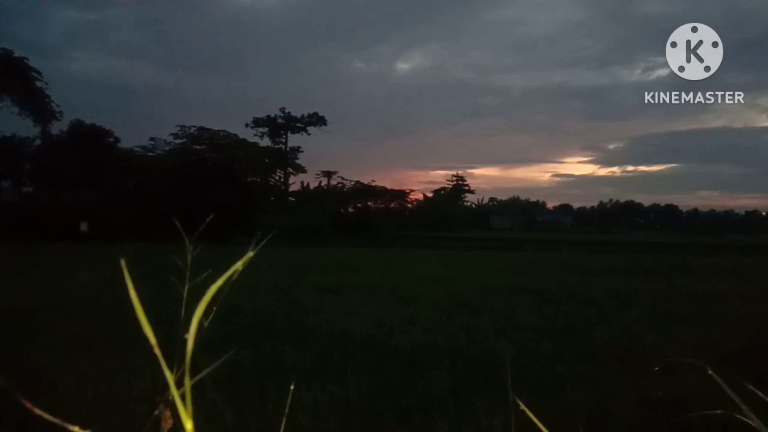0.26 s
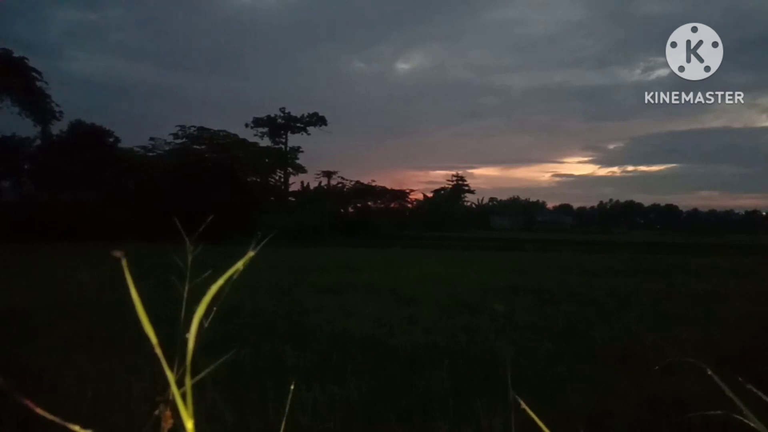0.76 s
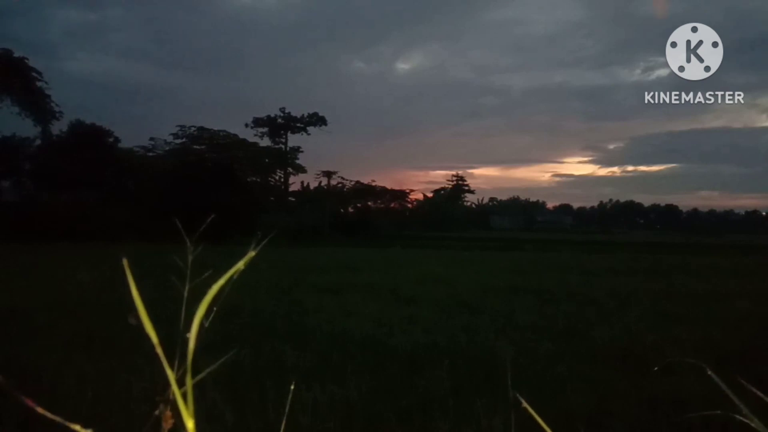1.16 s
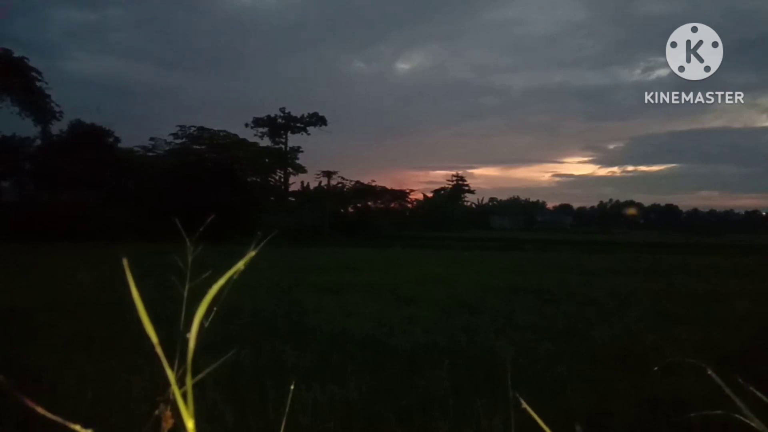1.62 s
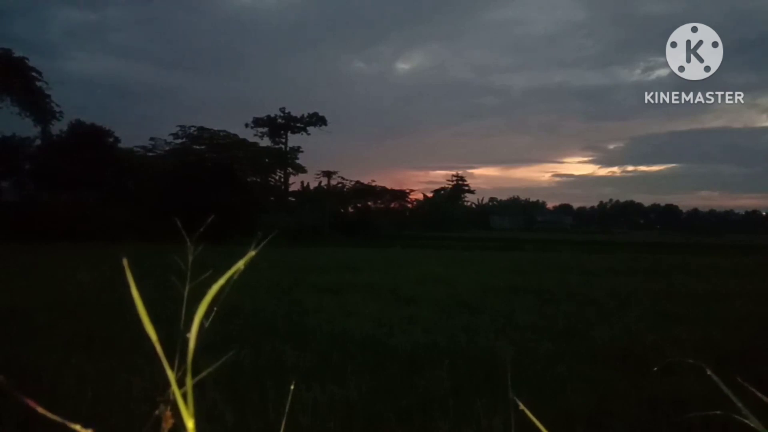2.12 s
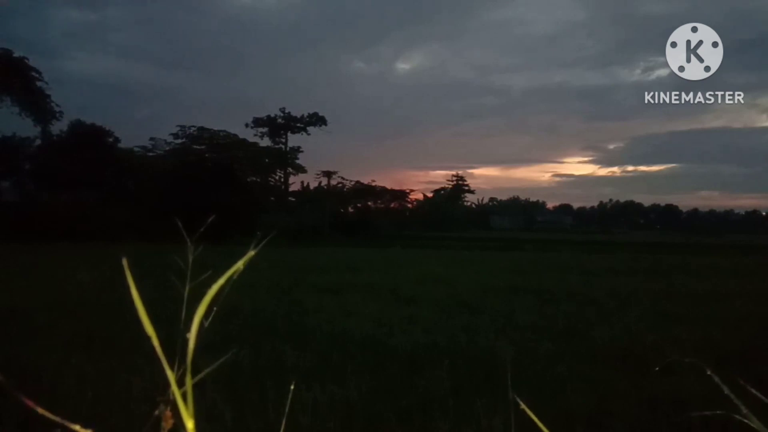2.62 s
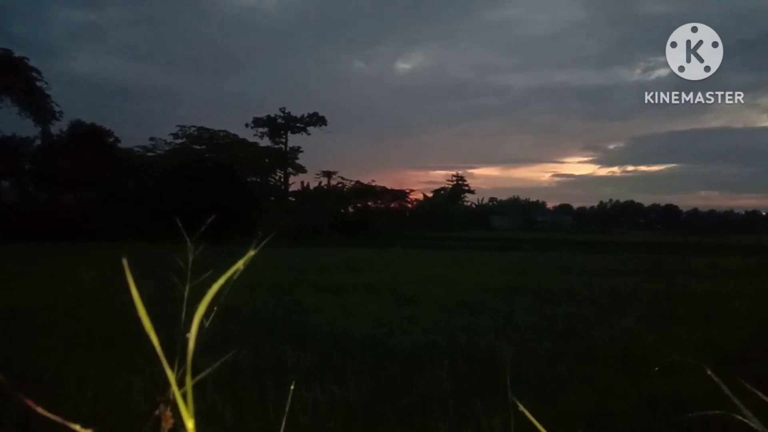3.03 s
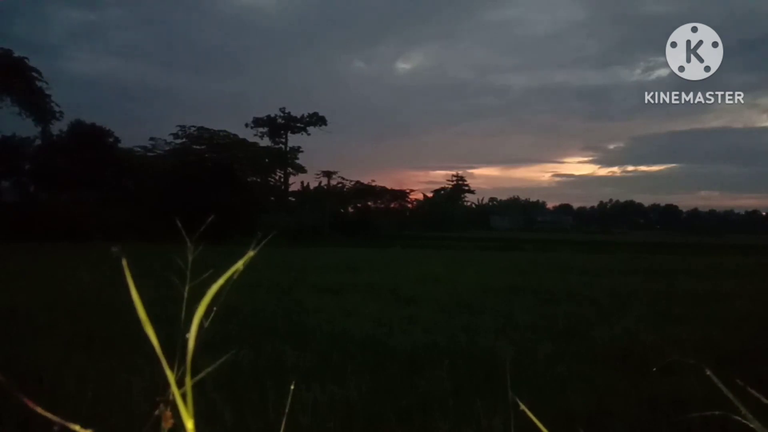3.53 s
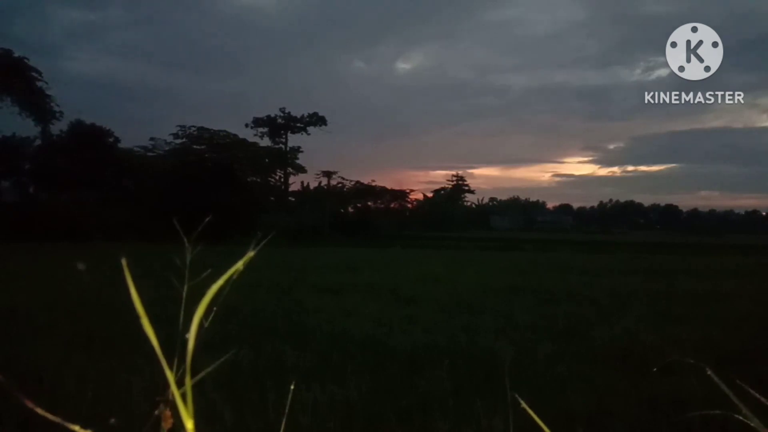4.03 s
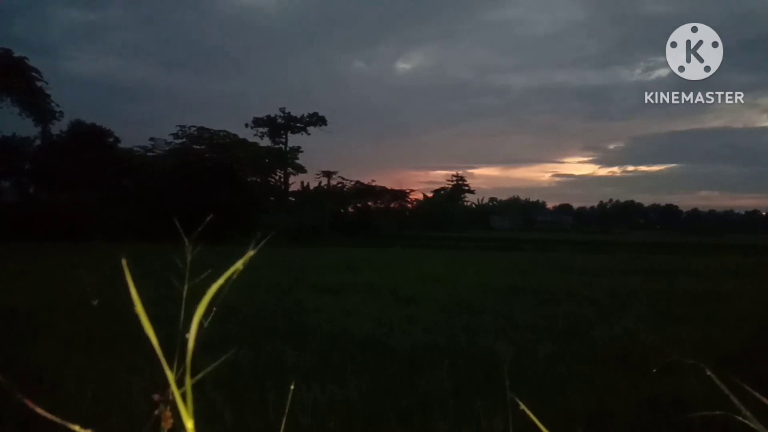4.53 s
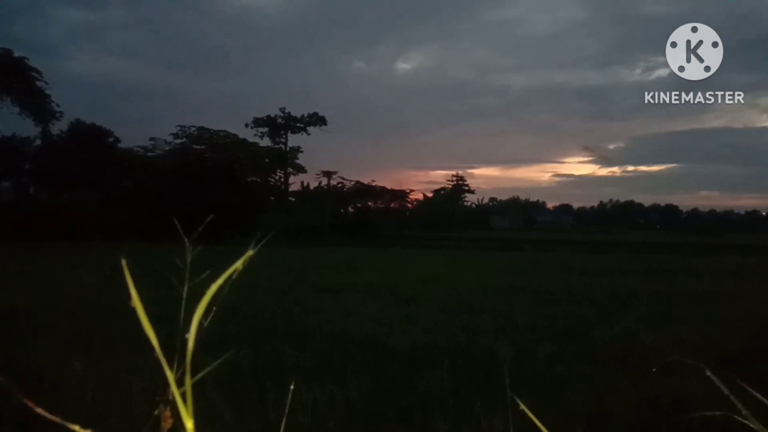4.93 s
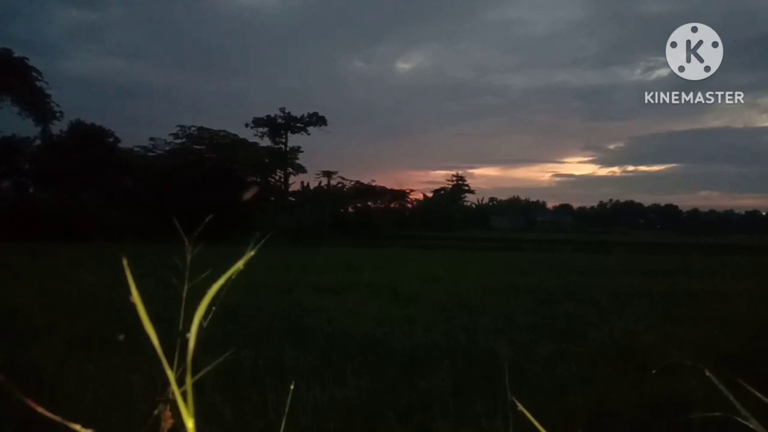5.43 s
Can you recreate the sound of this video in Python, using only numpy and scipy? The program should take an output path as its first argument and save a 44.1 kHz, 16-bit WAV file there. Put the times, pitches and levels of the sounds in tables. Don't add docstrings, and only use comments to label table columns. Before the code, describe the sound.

Dusk over open fields, with constant soft air hiss, faint low rumble and a high shimmering insect chorus that briefly hushes near 3.8 and 4.8 s. From 0 to 2.5 s an owl gives a low, rapid trill, about twelve soft sinking notes a second, with hoarse breath ending by 2.8. A near cricket chirps in four bright bursts from 0.3 to 1.1. From 1.7 to 2.7 a second, higher owl adds eight short arched hoots, growing from faint to strong. At 3.3 it gives a long hoot, rising quickly then falling until 4.1, echoing from trees; a sharp dry crack snaps at its start. Small frogs peep roughly every second, fainter ones between, over soft pulsed frog trills. Thin cricket buzzes pepper 3.6 to 5.1, with a faint grass brush at 4. Tiny ticks come at 5.3, then thin, wavering far owl whistles to 5.7.

```python
import sys
import numpy as np
from scipy import signal
from scipy.fft import rfft, irfft, next_fast_len
from scipy.io import wavfile
from scipy.ndimage import uniform_filter1d

SR = 44100
rng = np.random.default_rng(int(sys.argv[2]) if len(sys.argv) > 2 else 0)


def ratio(d):
    e = np.asarray(d, float) / 20
    return 10 ** e


def unload_wav(signal):
    wavfile.write(
        sys.argv[1],
        SR,
        np.round(np.clip(np.atleast_2d(signal).T, -1, 1) * 32767).astype(np.int16),
    )


N = 249606


def evened(x):
    return x / np.sqrt(np.mean(x ** 2) + 1e-20)


def add(mix, s, sound):
    part = mix[max(round(s * SR), 0):][:len(sound)]
    part += sound[:len(part)]


def resonate(x, hz, width_hz):
    turn = np.exp(2j * np.pi * np.cumsum(hz * np.ones(len(x))) / SR)
    r = np.exp(-np.pi * width_hz / SR)
    smoothed = signal.lfilter([(1 - r) ** 2], np.convolve([1, -r], [1, -r]), x / turn)
    return 2 * (turn * smoothed).real


def tone(hz, second_db=-60):
    turn = 2 * np.pi * (np.cumsum(hz) / SR + rng.random())
    return np.sin(turn) + ratio(second_db) * np.sin(2 * turn)


def note(length_s, shape):
    u = np.arange(round(length_s * SR)) / (length_s * SR)
    return u, uniform_filter1d(np.interp(u, *np.transpose(shape)), size=150, mode="constant")


def along(rows):
    s, *columns = np.transpose(rows)
    t = np.arange(s[0], s[-1], 1 / SR)
    return [np.interp(t, s, c) for c in columns]


def flutter(per_s):
    t = np.arange(0, N + 64, 64)
    rates = per_s * np.geomspace(.2, 1, 12)
    slow = sum(np.sin(2 * np.pi * (f * t / SR + rng.random())) for f in rates)
    return np.interp(np.arange(N), t, evened(slow))


def tail(x, t60, start_s):
    t = np.arange(2 * SR) / SR
    signs = np.sign(rng.standard_normal(len(t)))
    sparse = rng.random(len(t)) < .045
    taps = signs * sparse * ratio(-60 * t / t60) * (t > start_s)
    size = next_fast_len(N + len(t))
    return irfft(rfft(x, size) * rfft(taps / np.linalg.norm(taps), size), size)[:N]


def hiss(points, patchy_db):
    frames, hz = N // 256 + 5, np.fft.rfftfreq(1024, 1 / SR)
    a, b, patches = rng.standard_normal((frames, 513, 3)).T
    patches = uniform_filter1d(uniform_filter1d(patches, size=5, axis=0), size=8, axis=1)
    f, db = np.transpose(points)
    colour_db = np.interp(np.log(hz + 1), np.log(f + 1), db)[:, None]
    spectra = (a + 1j * b) * ratio(colour_db + patchy_db * evened(patches))
    return evened(signal.istft(spectra, nperseg=1024, noverlap=768)[1][:N])


def breath():
    end_s, fade_s = 2.72, 0.047
    over = np.maximum(np.arange(N) / SR - end_s, 0) / fade_s
    air = evened(resonate(rng.standard_normal(N), 694, width_hz=240))
    return ratio(-44 - 20 * over + 1.9 * flutter(21)) * air


# start in seconds, length in seconds, peak in dB.
TRILL = [(0.0, 0.03, -14.5), (0.073, 0.047, -15.5), (0.152, 0.046, -15.5), (0.231, 0.043, -14.5),
         (0.311, 0.04, -14.5), (0.384, 0.04, -15), (.461, .039, -13.5), (0.537, 0.039, -13.5),
         (0.611, 0.041, -15.5), (0.684, 0.038, -14.5), (0.759, 0.035, -13.5), (0.828, .042, -15),
         (.902, 0.044, -15), (.99, 0.042, -14), (1.082, 0.045, -13.5), (1.179, 0.049, -12.5),
         (1.279, 0.051, -13), (1.382, 0.048, -13), (1.48, 0.055, -12.5), (1.578, 0.062, -13.5),
         (1.684, 0.052, -14), (1.783, 0.045, -13), (1.879, 0.043, -13), (1.971, 0.047, -13.1),
         (2.061, 0.038, -13.5), (2.136, 0.044, -13), (2.209, 0.037, -14), (2.274, 0.044, -14),
         (2.351, 0.033, -13.5), (2.421, 0.035, -14.5)]


def trilling_owl():
    out, sounding = np.zeros(N), np.zeros(N)
    end_hz = 497
    for s, length, db in TRILL:
        u, shape = note(length + 0.011, [(0, 0.096), (.2, 0.76), (.42, 0.98), (.58, 0.91), (.85, 0.25), (1, 0)])
        start_hz = 547.3 + 4.8 * s
        hz = start_hz + (end_hz - start_hz) * u ** 2.03
        add(out, s - .004, ratio(db) * shape * tone(hz, second_db=-33))
        add(sounding, s - .004, shape)
    returns = ratio(-18) * tail(out, t60=0.26, start_s=0.0088)
    return out + returns + ratio(-4.1 * sounding) * breath()


# start in seconds, peak in dB rms.
ROUNDS = [
    (-.5, -40),
    (.55, -40.5),
    (1.58, -40.5),
    (2.64, -41),
    (3.73, -41.5),
    (4.72, -41),
    (5.75, -43),
]
# fraction gone by, upper throat pitch in Hz, level in dB.
ROUND = [(0, 3040, -11), (.3, 3050, -3), (.6, 3302, -2.5), (.93, 3310, -6), (1, 3370, -12)]


def trilling_frogs():
    start, peak_db = np.transpose(ROUNDS)
    fraction, throat_hz, swell_db = np.transpose(ROUND)
    t = np.arange(N) / SR
    rounds = np.interp(t, start, np.arange(len(start)))
    hz = np.interp(rounds % 1, fraction, throat_hz)
    db = peak_db[rounds.astype(int)] + np.interp(rounds % 1, fraction, swell_db)
    gate = 0.81 + np.exp(-(t * 128.5 % 1) / 0.27)
    upper = evened(resonate(gate * rng.standard_normal(N), hz, width_hz=335))
    lower_hz = 1590 + 0.27 * (hz - 3200)
    lower = evened(resonate(gate * rng.standard_normal(N), lower_hz, width_hz=225))
    return ratio(db) * upper + ratio(0.53 * (db + 48.0) - 49.5) * lower


# centre in Hz, width in Hz, level in dB rms, strokes per second, throb in dB.
CHORUS = [
    (4714, 700, -43.5, 1100, 0),
    (5814, 200, -43, 910, 0),
    (6180, 150, -48.5, 430, 4),
    (8110, 980, -47, 2500, 2),
]
# centre in seconds, half length in seconds, depth in dB.
LULLS = [
    (1.595, .06, -1.5),
    (3.78, 0.027, -10),
    (4.756, 0.059, -10),
]


def chorus():
    t = np.arange(N) / SR
    db = sum(depth_db * np.maximum(1 - abs(t - s) / half, 0) for s, half, depth_db in LULLS)
    throb = np.sin(2 * np.pi * 4.4 * t + 1.1 + 0.8 * flutter(0.51))
    out = np.zeros(N)
    for hz, width, band_db, per_s, throb_db in CHORUS:
        strokes = rng.standard_normal(N) * (rng.random(N) < per_s / SR)
        strokes *= ratio(0.43 * np.minimum(rng.exponential(1, N), 4))
        level_db = band_db + throb_db * throb + 1.57 * flutter(12)
        out += ratio(level_db) * evened(resonate(strokes, hz, width))
    return out * ratio(db - db.mean())


# pitch in Hz, level in dB per Hz.
AIR = [(1000, -28), (1300, -12.5), (1600, -14), (2050, -10.5), (2600, -6), (3000, -3), (3900, -5),
       (4900, -2), (5900, 0), (6900, -8.5), (9200, -10), (9700, -15.5), (11000, -19.5), (15500, -19)]
# pitch in Hz, level in dB per Hz.
RUMBLE = [(15, -32), (30, -23), (55, -17.5), (82, 0), (110, -7), (160, -4), (300, -8.5), (600, -8.5),
          (900, -9.5), (1200, -11.5), (1500, -41.5)]


def open_air():
    return ratio(-36) * hiss(AIR, patchy_db=2.0) + ratio(-50) * hiss(RUMBLE, patchy_db=-1.5)


# pitch in Hz, level in dB per Hz.
APART = [(20, -33), (60, -13), (200, -6.5), (500, -14.5), (1100, -21), (1600, -32.5), (4100, -15.5),
         (4700, 6.5), (5200, -19), (6200, -23), (6600, 6.5), (7000, -23.5), (12000, -16), (15500, -20)]


def air_apart():
    return ratio(-50) * hiss(APART, patchy_db=2.0)


# time of full voice in seconds, level in dB rms.
PEEPS = [
    (0.659, -35.5),
    (1.724, -34.5),
    (2.767, -34.5),
    (3.82, -34.5),
    (4.836, -34.5),
]
# start in seconds, peak in dB.
FAINT_PEEPS = [
    (.02, -38),
    (1.09, -40),
    (2.141, -39),
    (3.2, -40),
    (4.24, -36),
    (5.28, -39),
]


def peeping_frogs():
    loud, out = np.zeros(N), np.zeros(N)
    rise_s, hold_s, fall_s, soft_db = .1, 0.064, 0.07, -13.5
    corners = np.cumsum([0, rise_s, hold_s, fall_s])
    t = np.arange(0, corners[-1], 1 / SR)
    hz = 1459 + 40 * np.exp(-t / 0.124)
    for s, level_db in PEEPS:
        swell_db = np.interp(t, corners, [soft_db, 0, -.7, soft_db]) + 0.39 * flutter(35.4)[:len(t)]
        voice = tone(hz, second_db=14 + 1.1 * swell_db) * signal.windows.tukey(len(t), .1)
        add(loud, s - rise_s, ratio(level_db - 9.0 + 0.33 * swell_db) * voice)
        u, shape = note(0.22, [(0, 0), (.4, 0.3), (1, 0.1)])
        add(out, s, ratio(level_db - 6.5) * shape * tone(3222 + 12 * (.5 - u)))
    add(out, .09, ratio(-16) * loud)
    for s, db in FAINT_PEEPS:
        u, shape = note(0.077, [(0, 0.81), (.4, 0.7), (1, 0.2)])
        add(out, s, ratio(db - 14) * shape * tone(1472 - 6 * u, second_db=10.5))
    out += loud
    return out + ratio(-4.5) * tail(out, t60=0.46, start_s=0.015)


def stroke(length_s, start_hz, end_hz):
    u, shape = note(length_s, [(0, 0.39), (.12, 0.3), (.28, 0.58), (.43, 0.41), (.58, 0.71), (.75, 0.19),
                               (1, 0.045)])
    lift = 1 + 0.005 * rng.standard_normal()
    return shape * tone(lift * (start_hz + (end_hz - start_hz) * u ** 1.32))


# start in seconds, peak in dB.
CHIRPS = [(0.342, -19), (.375, -18), (.409, -16), (.444, -18), (.594, -20), (0.628, -16.5), (.659, -16),
          (0.807, -18.5), (.84, -16), (0.875, -17), (1.021, -18), (1.054, -16.5), (1.088, -16.5)]
# start in seconds, length in seconds, peak in dB.
BUZZES = [
    (1.224, .09, -33),
    (3.577, 0.046, -27),
    (3.797, 0.076, -26),
    (4.049, 0.094, -28.5),
    (4.312, 0.083, -27),
    (4.6, .062, -25.5),
    (4.908, 0.043, -25),
    (5.042, 0.044, -34),
]
# time in seconds, pitch in Hz, level in dB rms.
WHISTLE = [(3.791, 5540, -43), (3.81, 5450, -42), (3.94, 5510, -37), (3.969, 5550, -40)]


def crickets():
    near, out = np.zeros(N), np.zeros(N)
    for s, db in CHIRPS:
        add(near, s - .002, ratio(db) * stroke(0.0235, start_hz=5140, end_hz=4200))
    add(out, .018, ratio(-16) * near)
    out += ratio(-4.5) * tail(near, t60=0.16, start_s=0.0044)
    u = np.linspace(0, 1, 230)
    for s, length, db in BUZZES:
        for at in np.arange(0, length, 1 / 113):
            late_s = 0.00092 * rng.standard_normal()
            level = ratio(db - 1.7 * rng.random())
            add(out, s + at + late_s, level * np.sin(np.pi * u) ** 0.71 * tone(5450 - 1150 * u ** 0.95))
    hz, db = along(WHISTLE)
    level = np.sqrt(2) * ratio(db + 2.4 * flutter(79)[:len(db)])
    add(out, WHISTLE[0][0], level * tone(uniform_filter1d(hz, size=1500)))
    return near + out


# start in seconds, length in seconds, centre in Hz,
# level in dB rms.
RUSTLES = [
    (0.748, .05, 600, -53),
    (3.998, 0.13, 1920, -47),
    (4.642, 0.2, 1513, -52),
]


def rustles():
    out = np.zeros(N)
    for s, length, hz, db in RUSTLES:
        u, shape = note(length, [(0, 0), (.15, 1), (1, 0)])
        add(out, s, ratio(db) * shape * evened(resonate(rng.standard_normal(len(u)), hz, width_hz=hz)))
    return out


# start in seconds, length in seconds, peak in dB, top in Hz, arch depth in Hz.
NOTES = [
    (1.71, 0.038, -31.5, 756, 39),
    (1.848, 0.053, -20, 794, 16),
    (1.982, 0.056, -12, 819.5, 23.4),
    (2.109, 0.061, -11, 837, 29.6),
    (2.245, 0.054, -12, 851, 41),
    (2.377, 0.064, -12, 846.7, 46),
    (2.511, 0.059, -10.5, 840, 27),
    (2.658, 0.047, -9.5, 848, 32.4),
]
ARCH = [(0, -1.88), (.2, -.85), (.62, 0.54), (.86, -.75), (1, -2)]
# time in seconds, pitch in Hz, level in dB rms.
HOOT = [(3.275, 615, -53.5), (3.332, 738, -19.5), (3.359, 806, -13.5), (3.42, 829, -9.5), (3.57, 818, -10),
        (3.72, 804, -13.5), (3.882, 774.6, -13.5), (4.002, 688, -28.5), (4.1, 572, -46.5)]
# delay in seconds, level in dB.
ECHOES = [
    (.03, -25.5),
    (.082, -13.5),
    (.097, -38),
    (.125, -22.5),
]


def hooting_owl():
    notes, hoot, thrown = np.zeros(N), np.zeros(N), np.zeros(N)
    for s, length, db, top_hz, depth_hz in NOTES:
        u, shape = note(length + 0.024, [(0, 0), (.11, 0.51), (.36, 0.97), (.62, 0.62), (.84, 0.62), (1, 0)])
        hz = top_hz + depth_hz * np.interp(u, *np.transpose(ARCH))
        add(notes, s - .008, ratio(db) * shape * tone(uniform_filter1d(hz, size=300), second_db=-45.5))
    hz, db = along(HOOT)
    level = np.sqrt(2) * ratio(uniform_filter1d(db, size=400))
    add(hoot, HOOT[0][0], level * tone(uniform_filter1d(hz, size=800)))
    away = notes + ratio(-5.5) * hoot
    for delay, db in ECHOES:
        add(thrown, delay, ratio(db) * away)
    thrown = resonate(thrown, 716, width_hz=530)
    add(thrown, .11, ratio(-8) * resonate(hoot, 792.7, width_hz=26))
    near = ratio(-20 + .8 * flutter(18)) * tail(away, t60=.5, start_s=.05)
    far = ratio(-17.0 + 2.1 * flutter(40)) * tail(away, t60=2.0, start_s=0.17)
    return notes + hoot + thrown + near + far


# start in seconds, peak in dB, centre in Hz, width in Hz, decay in seconds.
SNAPS = [
    (3.3296, -9, 5800, 6500, .0018),
    (5.2778, -21, 13500, 6000, .0004),
    (5.3084, -25, 13000, 6000, .0004),
    (4.636, -34, 12500, 4000, .0005),
]


def snaps():
    out, t = np.zeros(N), np.arange(600) / SR
    for s, db, hz, width, decay in SNAPS:
        burst = rng.standard_normal(len(t)) * np.exp(-t / decay)
        burst = resonate(resonate(burst, hz, width), hz, width)
        add(out, s, ratio(db) * burst / abs(burst).max())
    return out


# start in seconds, length in seconds, peak in dB, start in Hz, end in Hz.
FAR_OWL = [
    (5.333, 0.036, -27, 874, 915),
    (5.359, 0.053, -32.5, 1045, 1030),
    (5.409, 0.098, -28, 1023, 1032),
    (5.526, 0.045, -27.5, 1022, 1046),
    (5.57, 0.048, -29.5, 1058, 1120),
    (5.618, 0.018, -39, 1110, 1250),
    (5.635, 0.05, -32, 850, 930),
]


def far_owl():
    out = np.zeros(N)
    for s, length, db, start_hz, end_hz in FAR_OWL:
        u, shape = note(length, [(0, 0.16), (.25, 0.65), (.45, 0.64), (.8, .6), (1, .15)])
        add(out, s, ratio(db) * shape * tone(start_hz + (end_hz - start_hz) * u ** 1.52))
    return out + ratio(-6) * tail(out, t60=0.49, start_s=.02)


def scene():
    owls = trilling_owl() + hooting_owl() + far_owl()
    small = peeping_frogs() + trilling_frogs() + crickets() + chorus()
    grass = snaps()
    apart = air_apart() + rustles() + ratio(-24) * grass
    return owls + small + open_air() + grass + np.array([apart, -apart])


def gated(x):
    hz, _, z = signal.stft(x, SR, nperseg=1024, noverlap=512)
    power = (abs(z) ** 2).mean(0)
    power = uniform_filter1d(uniform_filter1d(power, size=5, axis=0), size=2, axis=1)
    share = np.interp(hz, [9400, 10800, 12500, 15500], [0, .5, .42, .3])[:, None]
    keep = np.where(power < share * np.median(power, axis=1, keepdims=True), .1, 1)
    return signal.istft(z * keep, SR, nperseg=1024, noverlap=512)[1][:, :N]


def top_cut(x):
    return signal.sosfilt(signal.butter(12, 16160, fs=SR, output="sos"), x)


def record(dry):
    edge = signal.firwin(801, 15480, window=("kaiser", 9), fs=SR)
    mix = signal.oaconvolve(gated(dry), edge[None], "same")
    return top_cut(mix)


dry = scene()
out = record(dry)
unload_wav(out)
```